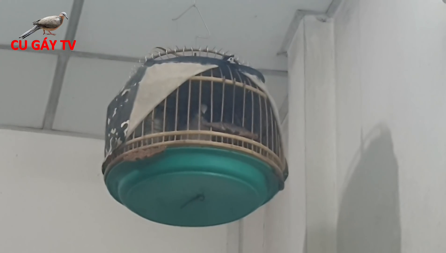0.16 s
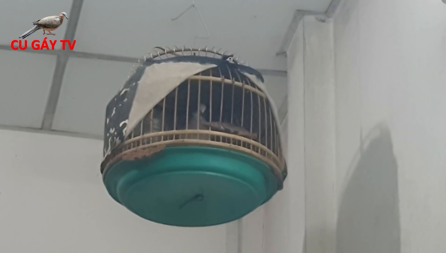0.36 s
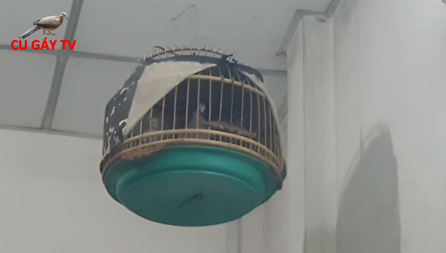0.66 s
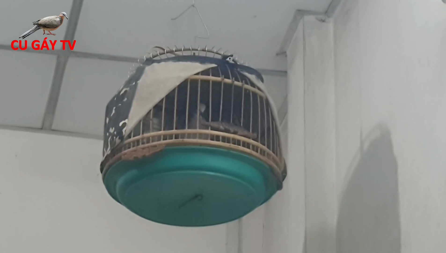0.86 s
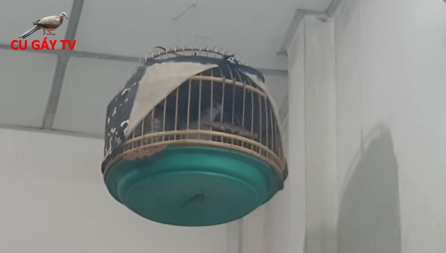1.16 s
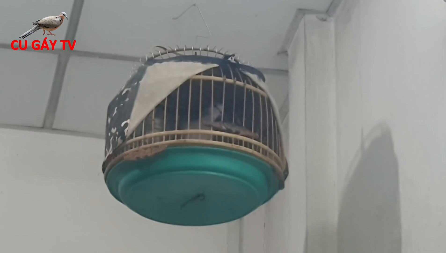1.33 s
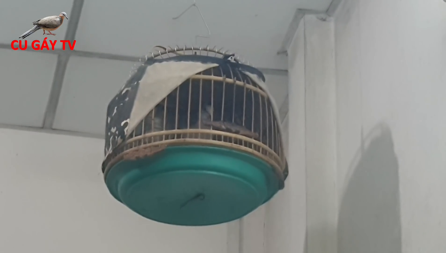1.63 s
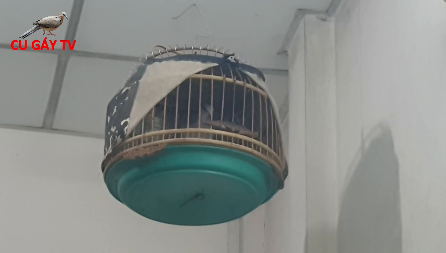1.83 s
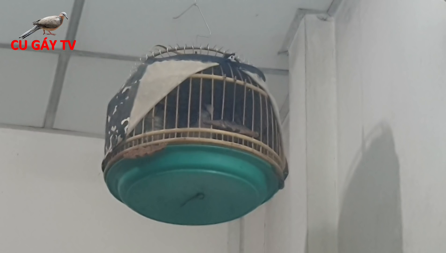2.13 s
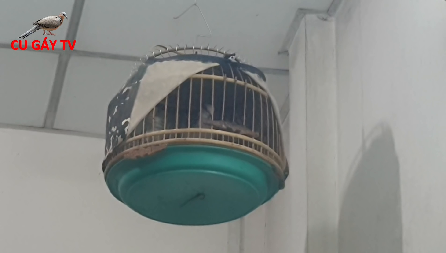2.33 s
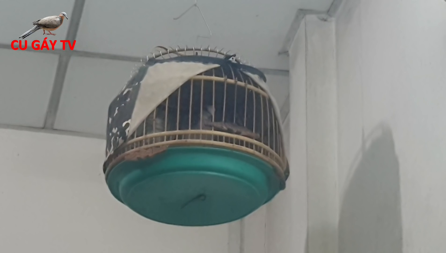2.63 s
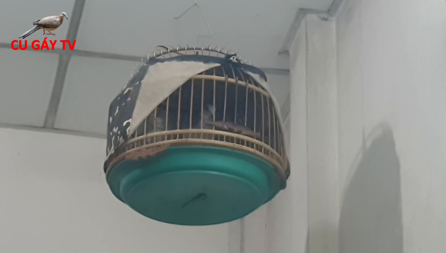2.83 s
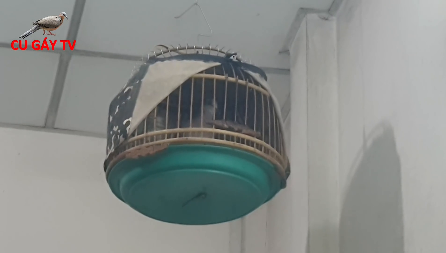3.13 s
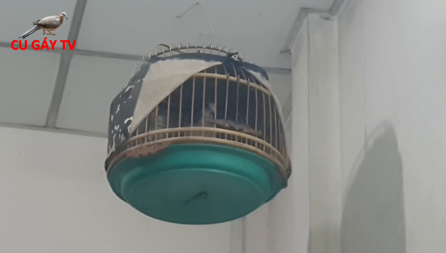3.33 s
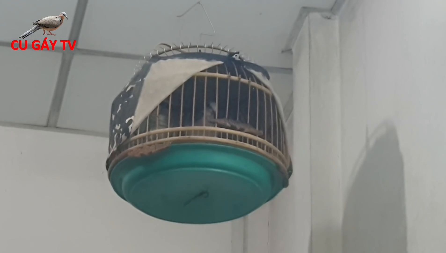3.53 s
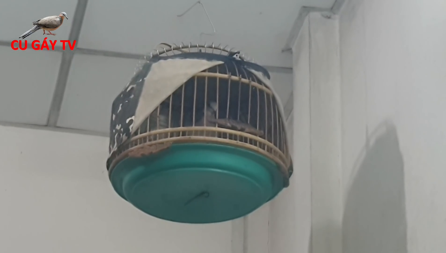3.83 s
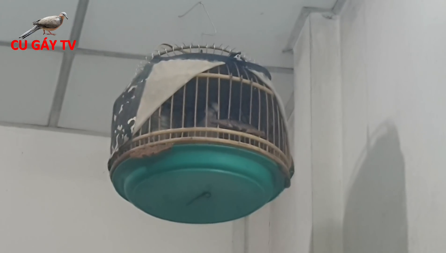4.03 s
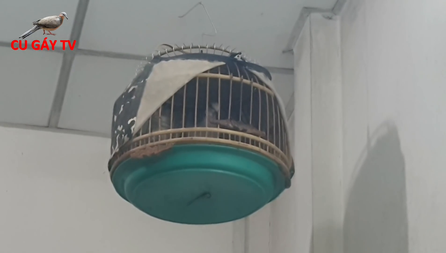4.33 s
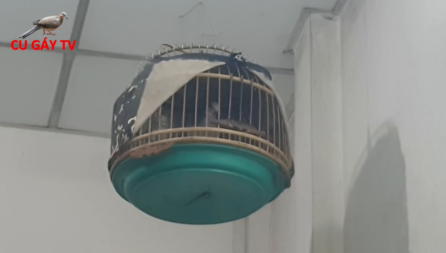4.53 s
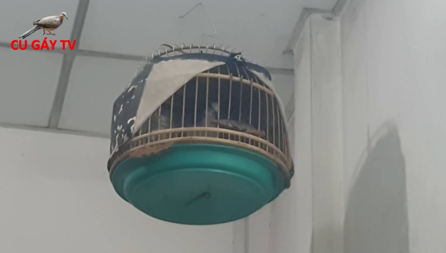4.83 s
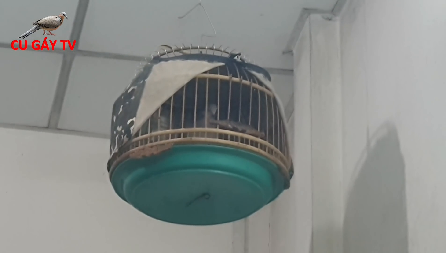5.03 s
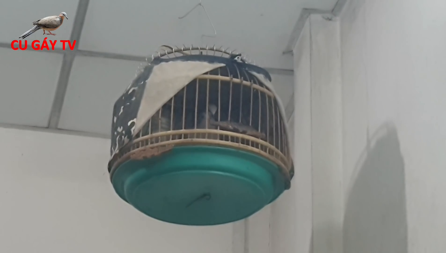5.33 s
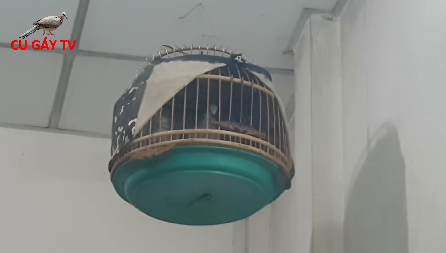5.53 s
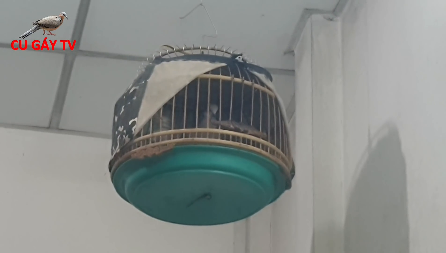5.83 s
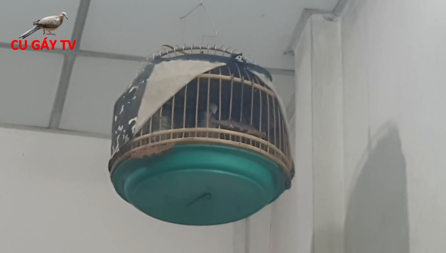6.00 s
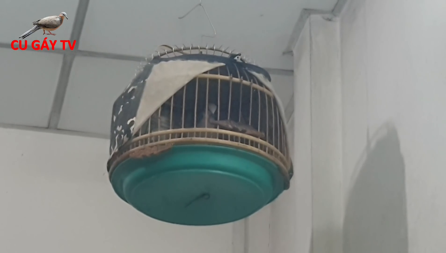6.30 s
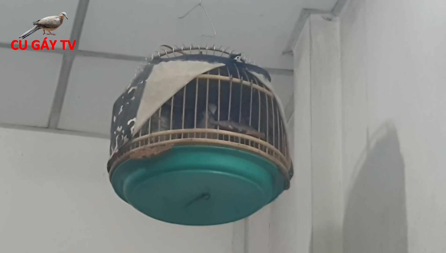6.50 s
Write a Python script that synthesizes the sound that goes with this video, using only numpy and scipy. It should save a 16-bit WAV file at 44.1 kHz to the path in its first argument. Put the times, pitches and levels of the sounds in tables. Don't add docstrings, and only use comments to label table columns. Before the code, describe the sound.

In a bare, reverberant room, a caged dove gives a short hoot and hoarse coo, then three calls of hoot, rising scooped hoot and long trilled coo sliding down. A fainter dove answers between them and sounds last. Low street rumble, light hiss, tiny cage ticks and thin outside chirps lie underneath, heard by a phone microphone.

```python
import sys
import numpy as np
from scipy import signal
from scipy.fft import rfft, irfft, next_fast_len
from scipy.io import wavfile
from scipy.ndimage import uniform_filter1d, map_coordinates

SR = 44100
rng = np.random.default_rng(int(sys.argv[2]) if len(sys.argv) > 2 else 0)


def persist_wave(psi):
    counts = np.round(np.clip(psi, -1, 1) * 32767).astype(np.int16)
    wavfile.write(sys.argv[1], SR, np.atleast_2d(counts).T)


def attenuation_scalar(level_db):
    decades = np.asarray(level_db, float) / 20
    return 10 ** decades


N = 293706

# pitch_hz, level_db (per Hz)
STREET_SPECTRUM = [(13, -44.5), (22, -22.5), (44, -2.5), (80, -14.5), (167, -2.5), (282, -5), (465, -14),
                   (559, -10.5), (654, -12), (1230, -18.5), (1370, -18), (1820, -18.5), (3340, -35),
                   (8800, -41.5), (9300, -46), (11800, -56), (15300, -88), (22000, -120)]
# pitch_hz, left_minus_right_db
STREET_LEAN = [(60, 5), (110, -0.5), (190, 3.5), (340, -1.5), (620, -1.5), (1100, 5), (1980, 3.5),
               (3540, 3.5), (6340, -0.5), (11400, 15)]
# pitch_hz, likeness (0-1)
STREET_LIKENESS = [(60, 1), (130, 0.93), (270, 1), (570, .55), (1200, 0.46), (2000, 0.35), (3500, 0.062),
                   (11000, 0.1)]
# pitch_hz, lead_radians
STREET_LEAD = [(60, .05), (300, 0.32), (860, 0.33), (1800, 3.24), (11000, 18)]
# pitch_hz, width_hz, level_db
MOTOR_TONES = [(1202, 9.4, -65), (994, 15, -67)]
# start_s, length_s, pitch_hz, level_db, left_minus_right_db
CHIRPS = [(0.166, .05, 5400, -74, 5), (0.377, 0.11, 3620, -64, 4), (2.332, 0.092, 3630, -62.5, -2),
          (2.382, .09, 5800, -68, -3), (2.928, .09, 4070, -65.5, 5), (2.939, 0.049, 5900, -78, 3),
          (4.193, 0.11, 3605, -68.5, 0), (5.397, 0.054, 6170, -74, -6), (5.463, 0.14, 4400, -73.5, -7),
          (5.7, .1, 4500, -76, -2), (5.76, .1, 5950, -76, 0), (5.852, 0.078, 4440, -72, -2.5),
          (5.896, 0.047, 5470, -76, 3.5), (6.293, .12, 3613, -66.5, -3)]
# start_s, level_db, brightness_db (per octave), left_minus_right_db
CAGE_TICKS = [(.115, -47.5, 0, 0.5), (.3, -53.5, 3.5, 3.5), (.372, -47, -9, 4.5), (0.729, -44.5, -7, 2),
              (.84, -55, 5, 6.5), (1.621, -56, -3, -1.5), (2.059, -58, 2.5, -5.5), (2.326, -47, -7, 4.5),
              (2.6, -54.5, -3.5, 0), (3.669, -54, -2.5, 4), (4.038, -55.5, 2, 1),
              (4.187, -50.5, -6.5, -4.5), (4.349, -62.5, 3, 3.5), (5.264, -53, 2, 2.5),
              (5.434, -45, -5.5, 6), (6.067, -52, -1.5, 5), (6.161, -62.5, -16, 0.5),
              (6.39, -52, -0.5, -1.5), (6.519, -53.5, 3, 5.5)]
# pitch_hz, ring_s (time to fall 60 dB)
RING_TIMES = [(300, 0.53), (700, 1), (1500, 0.28), (4000, 0.52), (10000, .35)]
# left_delay_s, right_delay_s, level_db
WALL_ECHOES = [(.007, .0072, -9), (0.014, .0163, -8), (.027, 0.024, -7), (0.036, 0.073, -8.5),
               (0.05, .0535, -4.5), (.08, 0.086, -6), (0.104, .1062, -6), (.16, 0.165, -11.5)]
# pitch_hz, width_hz, level_db
FAVOURED_TONES = [(540.5, 64, -2.5), (602.7, 25, 3.5), (691.2, 21.7, 4), (785.1, 20, 5.5),
                  (856.4, 36, -3.5)]
# pitch_hz, width_hz, level_db
PORT_COLOUR = [(3700, 580, -1.5), (4840, 780, 3.5), (8700, 210, -1)]
# multiple, level_db
OVERTONES = [(1, 0), (2, -39.5), (3, -47.5)]

FAR_HOOT_SHAPE = [(0, .92, -15, 0.42), (.42, 0.99, 2, 0.61), (.999, 0.95, -17, .45)]
FAR_COO_SHAPE = [(0, .82, -18, .4), (.16, .89, -11.5, .6), (.3, 1, 1, .8), (.55, .999, -3.5, .8),
                 (.73, .92, -4, .8), (.87, .77, -1, .7), (.999, 0.55, -10, .6)]
FAR_SLIDE_SHAPE = [(0, 0.9, -7, 0.59), (.22, .91, -1.5, .7), (.45, .83, -4.5, 0.88), (.7, .77, -5, 0.73),
                   (.9, .71, -9.5, .7), (.999, .7, -13, 0.36)]
GRACE_SHAPE = [(0, 0.746, -13.5, .15), (.45, .79, -5, 0.055), (.999, .8, -16, .1)]
HOOT_SHAPE = [(0, 0.679, -14, 0), (.2, .85, -1.5, 0.5), (.42, .99, -1.5, 0.09), (.64, 1, 3, 0.5),
              (.8, .84, -5.5, .15), (.999, 0.68, -3.5, 0.1)]
SCOOP_SHAPE = [(0, .73, -14, .3), (.25, .8, -8.5, .8), (.42, .9, -6, .5), (.52, .97, -1.5, .2),
               (.68, 0.99, -0.5, .2), (.84, 0.96, -4.5, 0.34), (.999, 0.764, -9, 0.25)]
COO_SHAPE = [
    (0, 0.96, -0.5, 0.56),
    (.1, 0.96, -0.5, 0.69),
    (.25, 0.97, -1, 0.753),
    (.44, .94, -1, 0.688),
    (.69, .84, -5, .55),
    (.87, 0.75, -8.5, 0.69),
    (.999, 0.58, -15.5, 0.93),
]
HOARSE_SHAPE = [(0, .94, -3, .65), (.2, .96, 0, .75), (.34, .999, -8, .97), (.58, .91, -7, .92),
                (.72, .825, -5, .4), (.91, .74, -13, .47), (.999, .65, -21, .8)]

# start_s, length_s, top_pitch_hz, level_db, fade_db (over the note)
FAR_HOOTS = [
    (.07, .12, 835, -52.5, -11.5),
    (3.46, .1, 808, -50, 0),
    (6.53, .09, 772, -46, 13),
]
FAR_COOS = [
    (2.6, .64, 890.3, -51.5, 0.0041),
]
FAR_SLIDES = [
    (6.05, .45, 799.8, -40.5, 0),
]
HOOTS = [
    (0, .15, 711.8, -40.5, 4),
    (1.523, 0.093, 703.3, -38.5, -1.5),
    (3.276, 0.087, 692.7, -39, 0),
    (5.157, .095, 784, -34.5, 1.5),
]
SCOOPS = [
    (1.7, .15, 707.5, -35, 3.5),
    (3.44, .15, 699, -37.5, -5),
    (5.32, .15, 701.7, -33.5, 3),
]
COOS = [
    (2.036, .414, 858, -32, 2),
    (3.777, .403, 863.6, -32.5, 1),
    (5.652, .418, 848.4, -30.5, 2.5),
]
HOARSE_COOS = [
    (.321, .404, 862, -33, 0),
]


def unit(x):
    return x / np.sqrt(np.mean(x ** 2) + 1e-20)


def along(points, hz):
    f, v = np.transpose(points)
    return np.interp(np.log(hz + 1), np.log(f + 1), v)


def wobble(rate, size=N):
    return map_coordinates(rng.standard_normal(size // 100 + 4), [np.arange(size) * rate / SR])


def filtered(x, response):
    m = next_fast_len(N + SR // 2)
    return irfft(rfft(x, m) * response(np.fft.rfftfreq(m, 1 / SR)), m)[..., :N]


def add(track, s, sound):
    part = track[..., max(round(s * SR), 0):][..., :sound.shape[-1]]
    part += sound[..., :part.shape[-1]]


def sides(db):
    return attenuation_scalar(np.array([[db / 2], [-db / 2]]))


def reverb(x):
    hz, t, z = signal.stft(rng.standard_normal((2, SR)), SR, nperseg=256)
    decay = attenuation_scalar(-60 * t / along(RING_TIMES, hz)[:, None])
    tail = signal.istft(z * decay, SR, nperseg=256)[1]
    tail = tail * np.minimum(np.arange(tail.shape[1]) / (0.016 * SR), 1)
    dove_band = signal.butter(2, [450, 950], "band", fs=SR, output="sos")
    scale = np.linalg.norm(signal.sosfilt(dove_band, tail), axis=1, keepdims=True) * 6.6
    return signal.fftconvolve(np.atleast_2d(x), tail / scale, axes=1)[:, :N]


def street_and_hiss():
    z = signal.stft(rng.standard_normal((2, N)), nperseg=512)[2]
    swells = uniform_filter1d(rng.standard_normal(z.shape[1:]), 6, 0)
    swells = uniform_filter1d(swells, 14, 1)
    pair = signal.istft(z * attenuation_scalar(1.13 * unit(swells)), nperseg=512)[1][:, :N]

    def shared_and_opposed(hz):
        angle = np.arccos(np.clip(along(STREET_LIKENESS, hz), -1, 1)) / 2
        return attenuation_scalar(along(STREET_SPECTRUM, hz)) * [np.cos(angle), np.sin(angle)]

    def port_difference(hz):
        lean_db = np.outer([.5, -.5], along(STREET_LEAN, hz))
        lead = np.outer([.5, -.5], along(STREET_LEAD, hz))
        return attenuation_scalar(lean_db) * np.exp(1j * lead)

    mid, side = filtered(pair, shared_and_opposed)
    both = filtered(np.array([mid + side, mid - side]), port_difference)
    out = attenuation_scalar(-48 - 0.5 * wobble(2.5)) * unit(both)
    for pitch_hz, width_hz, db in MOTOR_TONES:
        tone = filtered(rng.standard_normal((2, N)), lambda f: 1 / (1 + ((f - pitch_hz) / width_hz) ** 2))
        out = out + attenuation_scalar(db) * unit(tone)
    return out


def chirps():
    out = np.zeros((2, N))
    for s, length, start_hz, db, pan_db in CHIRPS:
        u = np.arange(0, 1, 1 / (length * SR))
        droop = 1 - 0.017 * u
        pitch = start_hz * droop * (1 + .015 * wobble(170, size=SR)[:len(u)])
        swell = np.sin(np.pi * u) ** 0.19
        flutter = attenuation_scalar(4.6 * wobble(90, size=SR)[:len(u)])
        whistle = np.sin(2 * np.pi * np.cumsum(pitch) / SR)
        add(out, s, attenuation_scalar(db) * sides(pan_db) * swell * flutter * whistle)
    return attenuation_scalar(-6.5) * out + attenuation_scalar(-2.5) * reverb(out)


def cage_ticks():
    out, t = np.zeros((2, N)), np.arange(SR // 2) / SR
    hz = np.fft.rfftfreq(len(t), 1 / SR)
    for s, db, tilt_db, pan_db in CAGE_TICKS:
        rise = 1 - np.exp(-t / .006)
        decay = (0.58 * attenuation_scalar(-60 * t / 0.17) + attenuation_scalar(-60 * t / 0.9)) * rise
        tilt = attenuation_scalar(tilt_db * np.log2((hz + 1) / 7000))
        colour = tilt / (1 + (3300 / (hz + 1)) ** 6)
        noise = irfft(rfft(rng.standard_normal((2, len(t)))) * colour)
        add(out, s, attenuation_scalar(db - 14.0) * sides(pan_db) * decay * noise)
    return out


def room(x):
    direct = np.array([x, np.roll(x, 5)])
    out = attenuation_scalar(-1.5) * reverb(x) + attenuation_scalar(.5) * direct
    for left_s, right_s, db in WALL_ECHOES:
        add(out[0], left_s, attenuation_scalar(db) * x)
        add(out[1], right_s, attenuation_scalar(db) * x)
    return out


def favoured(x):
    def response(f):
        return 0.71 + sum(attenuation_scalar(db - 4.5) * 1j * f * w / (c * c - f * f + 1j * f * w)
                          for c, w, db in FAVOURED_TONES)
    return filtered(x, response)


def sung(shape, notes):
    return [[(s + u * length, ratio * top_hz, db + rel_db - fade_db * u, depth)
             for u, ratio, rel_db, depth in sorted(shape)]
            for s, length, top_hz, db, fade_db in notes]


def dove(notes, trill_hz, sag_share, rasp_db):
    out = np.zeros(N)
    air = unit(filtered(rng.standard_normal(N), lambda f: 1 / (1 + ((f - 5950) / 220) ** 2)))
    rasp = unit(filtered(rng.standard_normal(N), lambda f: 1 / (1 + ((f - 700) / 260) ** 4)))
    for rows in sorted(notes):
        s, *cols = np.transpose(rows)
        t = np.arange(s[0], s[-1], 1 / SR)
        pitch, db, depth = (np.interp(t, s, c) for c in cols)
        depth = np.clip(depth, 0, 1)
        first = round(s[0] * SR)
        span = slice(first, first + len(t))
        sway = lambda rate: wobble(rate, size=SR)[:len(t)]
        beat = np.cumsum(trill_hz * (1 + 0.2193 * sway(29.96))) / SR
        gap = np.sin(np.pi * beat + .3) ** 2
        flip = 1 / (1 + np.exp((.72 - gap) / 0.069))
        height = np.clip(pitch / 600 - 1, 0, 1)
        sag = sag_share * height * depth * flip * attenuation_scalar(1.545 * sway(30.8))
        turn = 2 * np.pi * np.cumsum(pitch * (1 - sag + 0.0062 * sway(59.7))) / SR
        tone = np.sqrt(2) * sum(attenuation_scalar(level) * np.sin(round(k) * turn) for k, level in OVERTONES)
        hiss = attenuation_scalar(-44.0) * air[span]
        chop = (1 - 0.9 * depth * gap ** 1.1) * attenuation_scalar(2.5 * sway(59.4))
        breaks = attenuation_scalar(rasp_db) * depth * gap * rasp[span]
        edges = np.clip(np.minimum(t - s[0], s[-1] - t) / 0.009, 0, 1)
        add(out, s[0], attenuation_scalar(db + 2.0) * edges * (chop * (tone + hiss) + breaks))
    return out


def far_dove():
    notes = sung(FAR_HOOT_SHAPE, FAR_HOOTS) + sung(FAR_COO_SHAPE, FAR_COOS) + sung(FAR_SLIDE_SHAPE, FAR_SLIDES)
    voice = dove(notes, trill_hz=31.46, sag_share=.35, rasp_db=-3.5)
    return sides(2.9) * (attenuation_scalar(-2.5) * voice + attenuation_scalar(0.5) * reverb(voice))


def near_dove():
    graces = [(s - .044, 0.039, *rest) for s, _, *rest in COOS + HOARSE_COOS]
    notes = sung(GRACE_SHAPE, graces) + sung(HOOT_SHAPE, HOOTS) + sung(SCOOP_SHAPE, SCOOPS)
    notes = notes + sung(COO_SHAPE, COOS) + sung(HOARSE_SHAPE, HOARSE_COOS)
    voice = dove(notes, trill_hz=41.78, sag_share=.7, rasp_db=-8.0)
    return sides(3.2) * room(voice)


def scene():
    background = street_and_hiss() + chirps() + cage_ticks()
    return background + favoured(far_dove() + near_dove())


def band_limit(x):
    return signal.sosfilt(signal.butter(12, 11950, fs=SR, output="sos"), x)


def record(dry):
    def phone_response(hz):
        port = attenuation_scalar(sum(db / (1 + ((hz - c) / w * 2) ** 2) for c, w, db in PORT_COLOUR))
        treble_loss = (hz < 11950) / (1 + (hz / 11500) ** 24)
        bass_loss = 1 / (1 + (34 / (hz + 1)) ** 6)
        return port * treble_loss * bass_loss
    return band_limit(filtered(dry, phone_response))


dry = scene()
out = record(dry)
persist_wave(out)
```